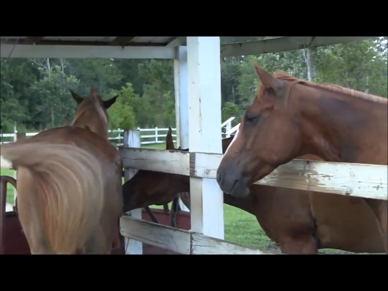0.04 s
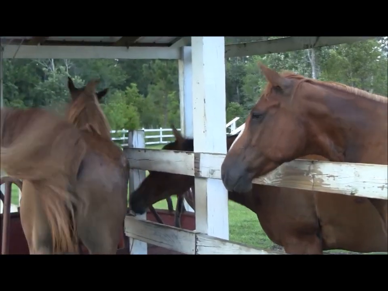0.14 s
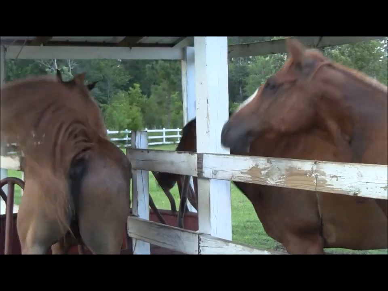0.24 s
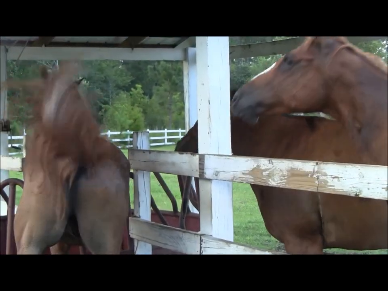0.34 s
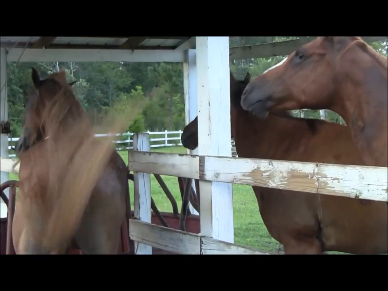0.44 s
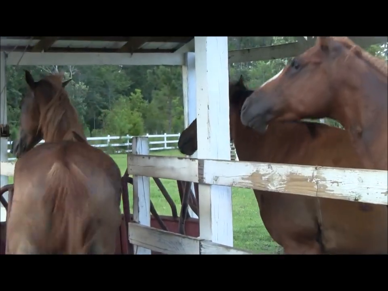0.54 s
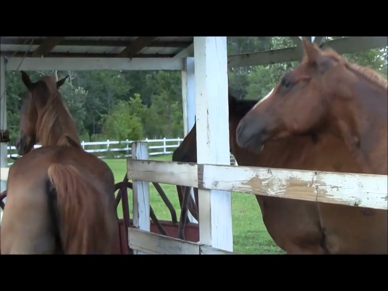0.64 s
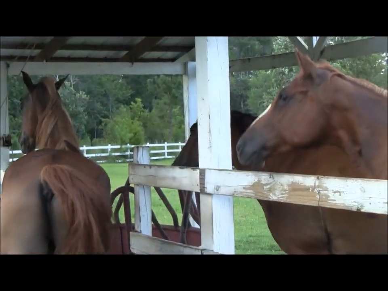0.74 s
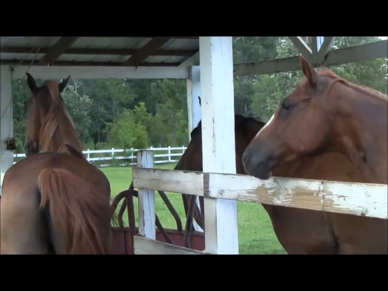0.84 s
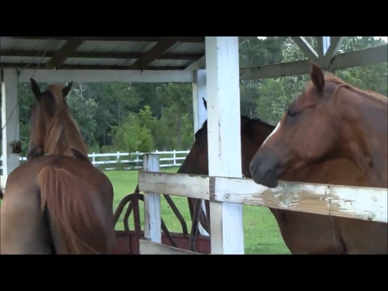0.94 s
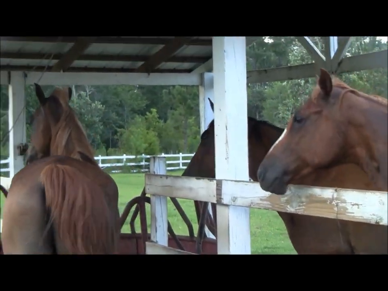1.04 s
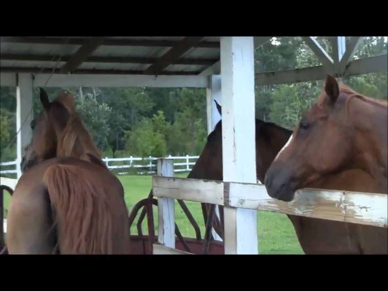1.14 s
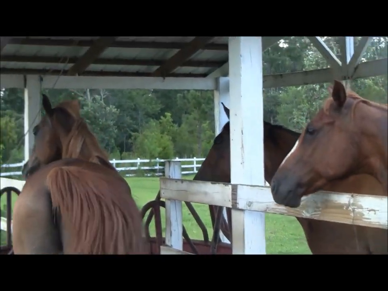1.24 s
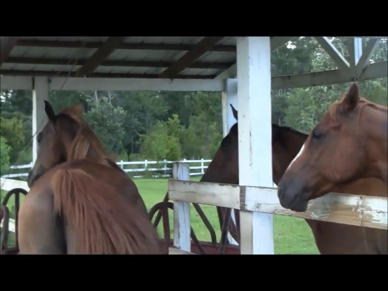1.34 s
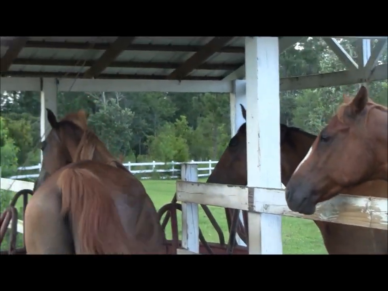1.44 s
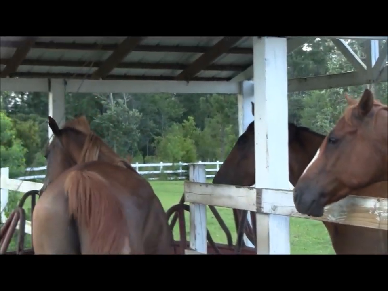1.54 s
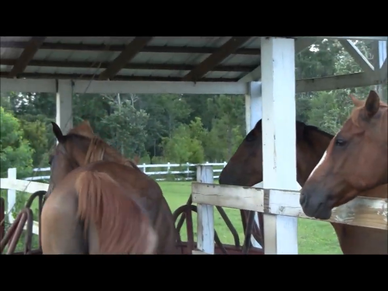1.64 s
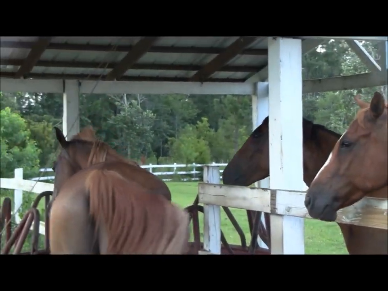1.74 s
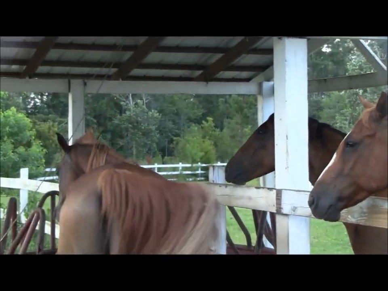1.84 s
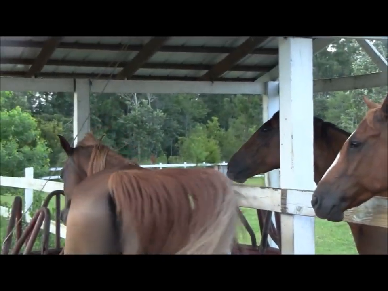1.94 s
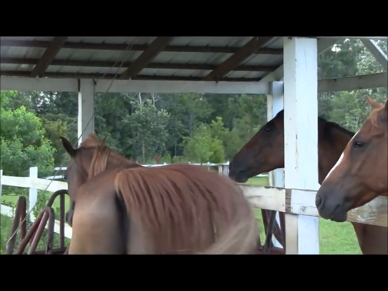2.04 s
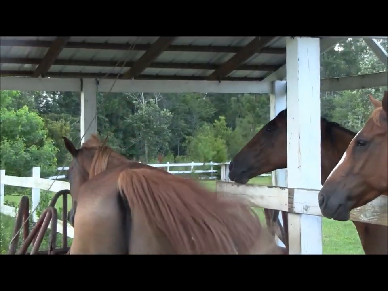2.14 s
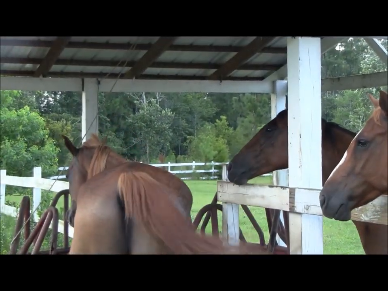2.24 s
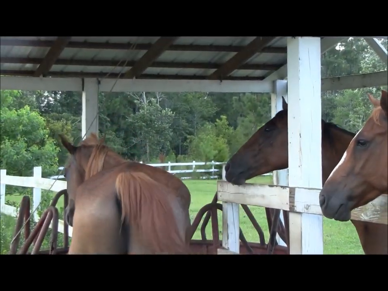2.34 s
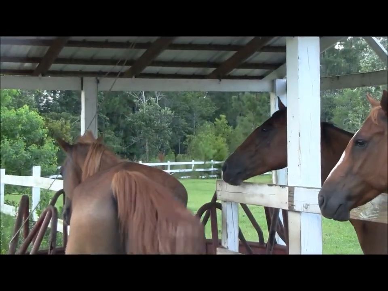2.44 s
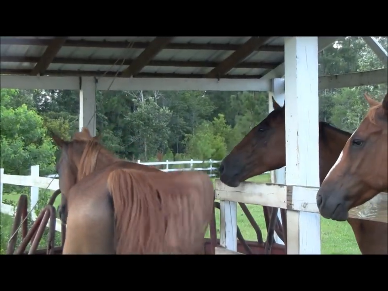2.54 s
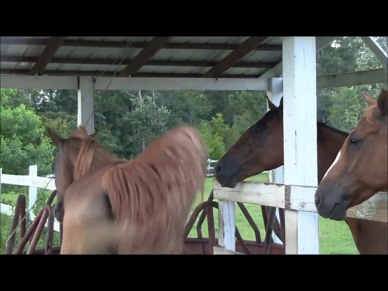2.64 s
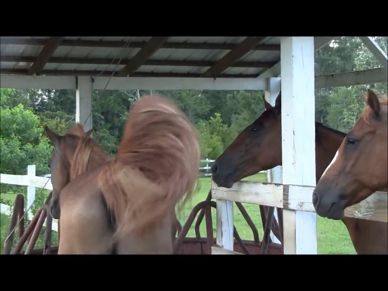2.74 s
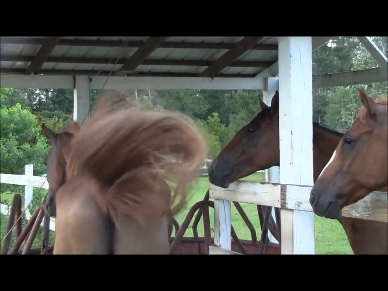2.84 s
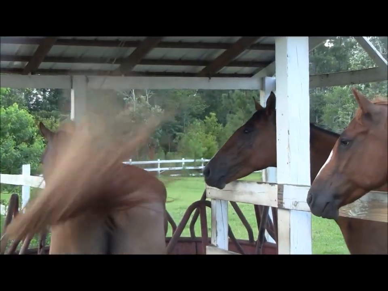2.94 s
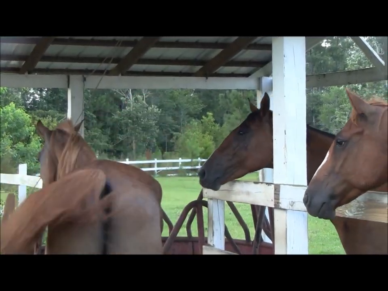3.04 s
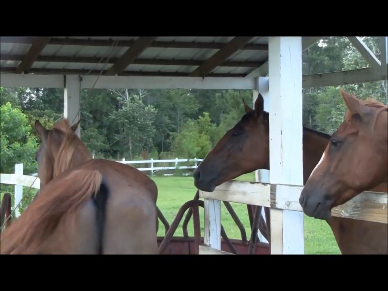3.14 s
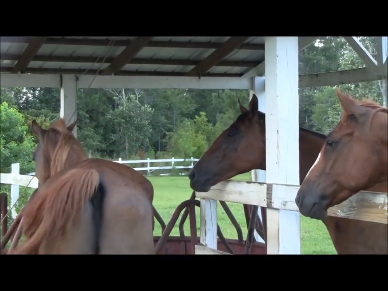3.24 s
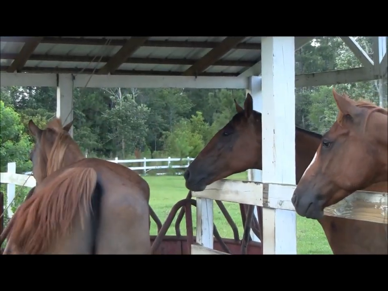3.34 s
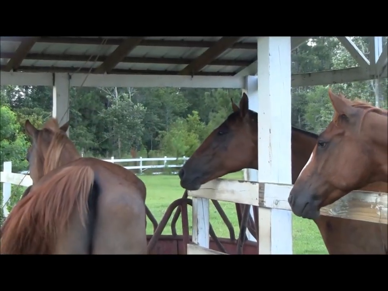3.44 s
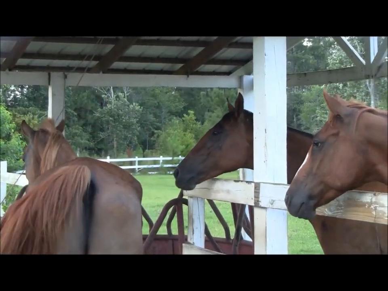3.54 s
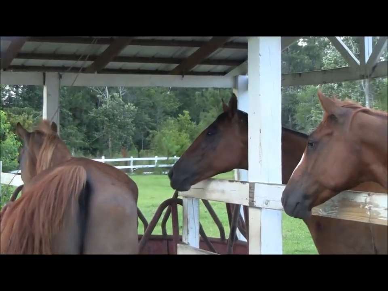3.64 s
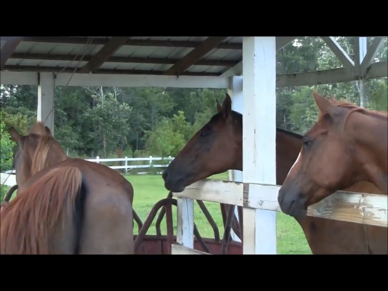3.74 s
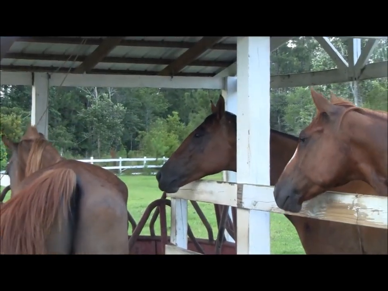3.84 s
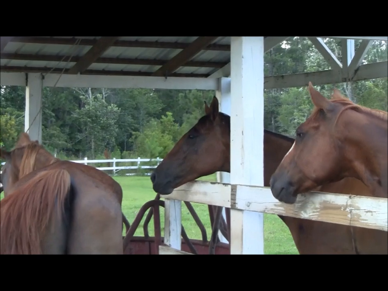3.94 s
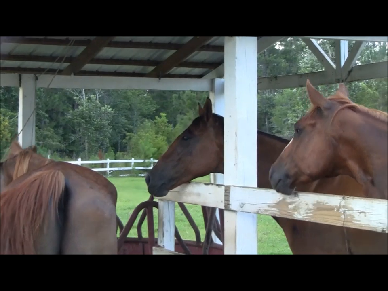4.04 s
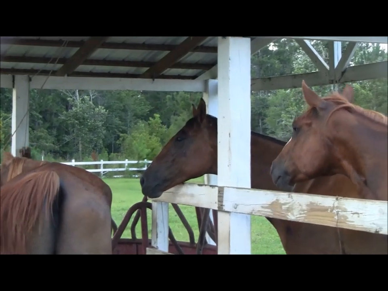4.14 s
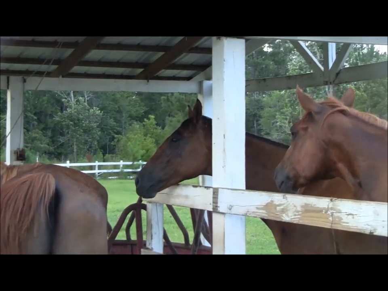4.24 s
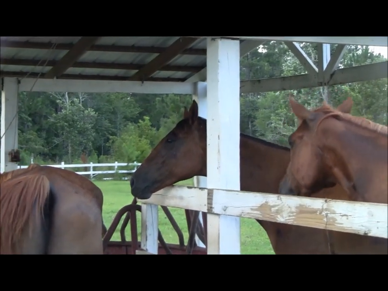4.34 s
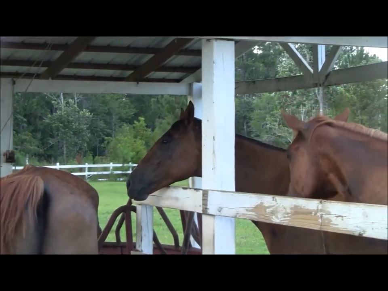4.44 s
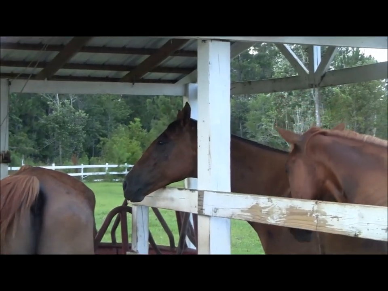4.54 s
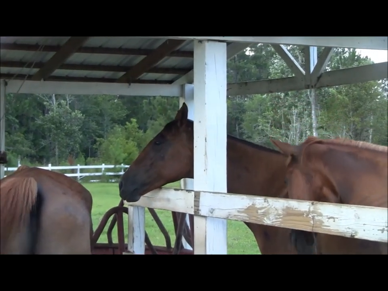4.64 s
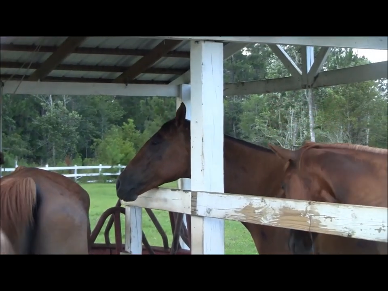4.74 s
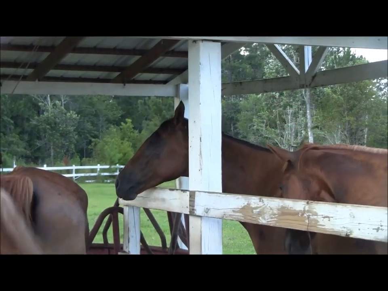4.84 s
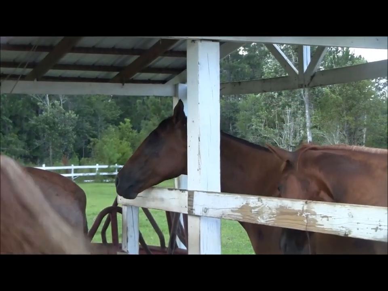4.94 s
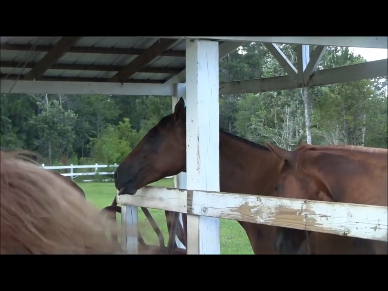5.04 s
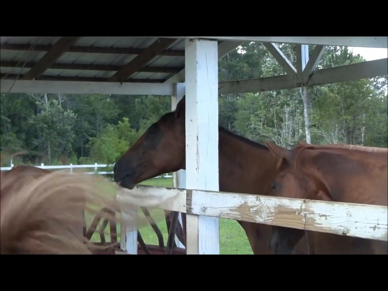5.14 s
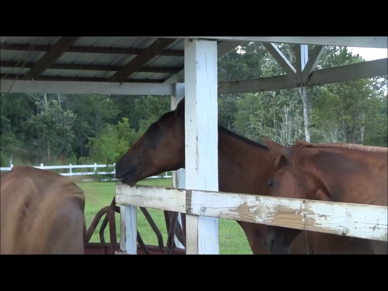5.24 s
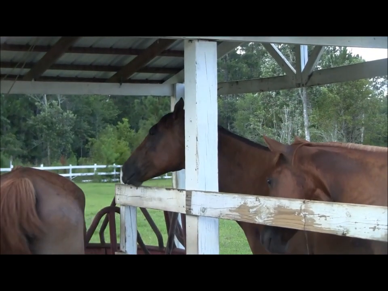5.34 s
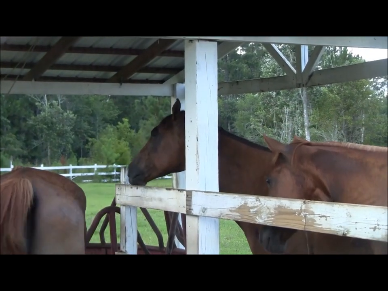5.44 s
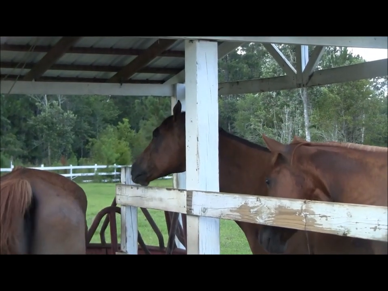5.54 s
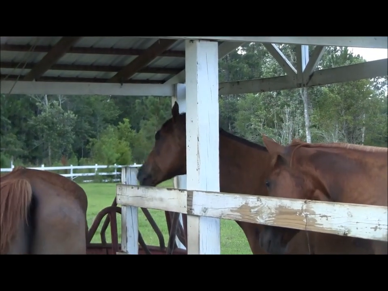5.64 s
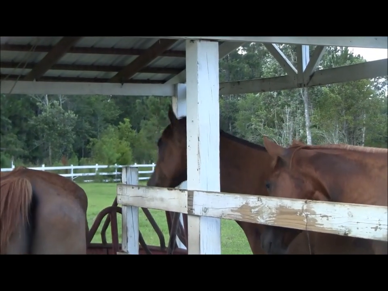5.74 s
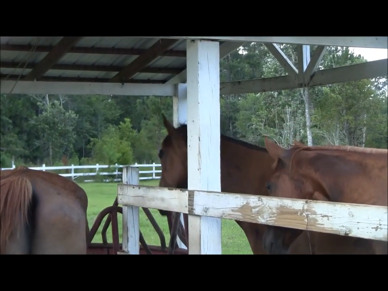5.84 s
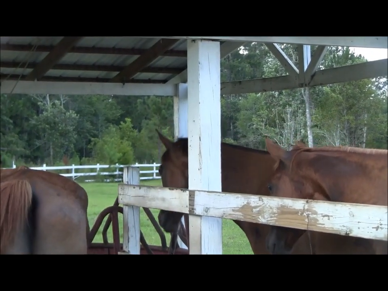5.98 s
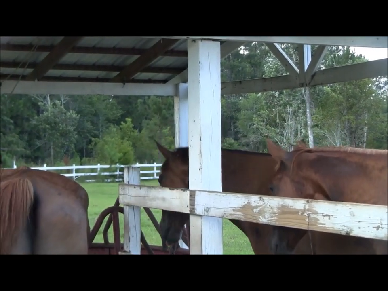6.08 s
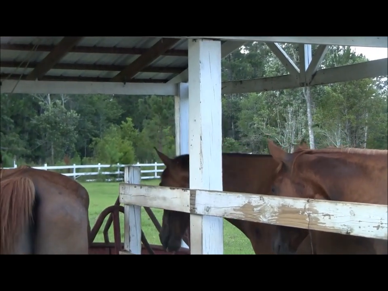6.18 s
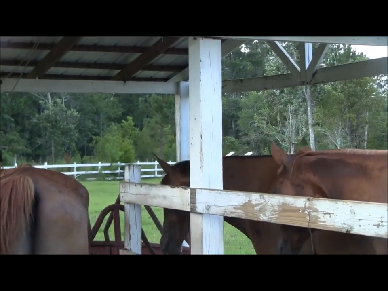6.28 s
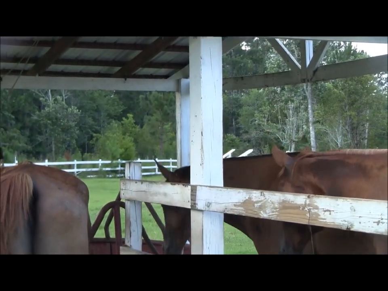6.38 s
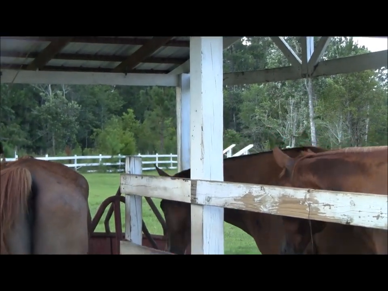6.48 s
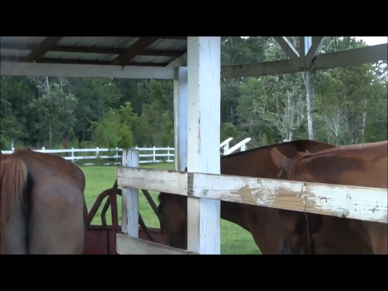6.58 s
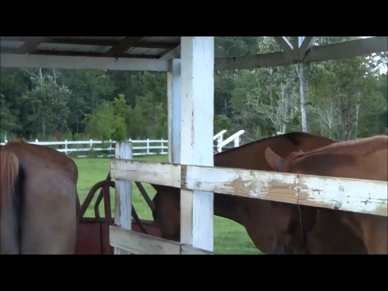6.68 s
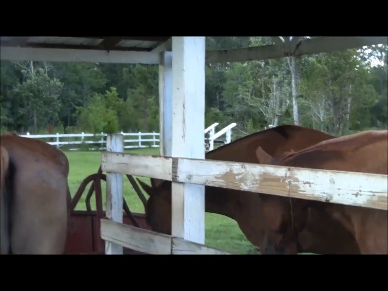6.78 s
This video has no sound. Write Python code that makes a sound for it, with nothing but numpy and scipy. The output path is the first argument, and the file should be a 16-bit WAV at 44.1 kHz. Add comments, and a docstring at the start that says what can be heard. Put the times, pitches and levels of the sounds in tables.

```python
"""Throughout, far traffic (shaped noise), an engine hum, pasture air and pulsed insect stridulation sound.
A horse squeals in an open shed: summed partials amid bursts of grainy breath noise, a rasp of gated noise,
a break to a rough register and a high whistle with sidebands. An overload drops the gain, which holds and
slowly comes back. Two small after-notes (partials with a pitch scoop) follow, hooves or rails tick (resonated
noise), tails swish (grainy noise), and near the end a bird gives two falling whistles (gliding tones)."""
import sys
import numpy as np
from scipy import signal
from scipy.fft import next_fast_len
from scipy.io import wavfile
from scipy.ndimage import uniform_filter1d

SR = 44100
rng = np.random.default_rng(int(sys.argv[2]) if len(sys.argv) > 2 else 0)


def wav_out(sig):
    """Save sig, one row per channel (or a flat mono array), as 16-bit PCM at SR to the path in sys.argv[1]."""
    wavfile.write(sys.argv[1], SR, np.round(np.clip(np.atleast_2d(sig).T, -1, 1) * 32767).astype(np.int16))


N = 300321
T = np.arange(N) / SR

# Likeness of the two ports before each source's scaling: (frequency [Hz], likeness [0-1])
PORT_LIKENESS = [(30, .88), (60, 1), (135, 1), (210, 0.77), (330, 0.42), (560, 0.17), (850, 0.61),
                 (1250, 1), (1900, 0.7), (2800, 0.36), (4000, 0.5), (5500, 0.27), (6800, 0.66),
                 (7700, 0.54), (8400, 0.77), (9300, 0.51), (10800, 0.17), (12000, 0.65)]
# Phase by which the right port leads: (frequency [Hz], lead [rad])
PORT_LEAD = [(20, 0), (230, 0), (300, 3.1), (600, 3.1), (750, -.3), (4000, -.4), (7000, .2), (7700, -.4),
             (8400, -.9), (9300, -2.3), (10400, -2.8), (11800, -1.1)]
# Port balance: (frequency [Hz], left minus right [dB])
PORT_BALANCE = [(60, -0.5), (110, 0.0), (200, 0.5), (380, 0.0), (700, 0.5), (1290, 1.0), (2380, 0),
                (4400, 1.5), (8120, -2.5), (15000, 2)]

# Far traffic: (time [s], engine rumble level [dB], tyre roar level [dB])
TRAFFIC_LEVELS = [(0, -46.5, -46.5), (.5, -50, -38.5), (1, -44, -39), (1.7, -43, -38.5), (2.5, -42.5, -37),
                  (3.4, -47, -40.5), (4.2, -49.5, -43), (5.4, -50, -43), (6.81, -50, -45)]
# Engine rumble spectrum: (frequency [Hz], relative density [dB per Hz])
RUMBLE_SPECTRUM = [(20, -46), (45, -41), (62, -14.5), (90, -15.5), (105, -6.5), (115, 3), (128, -9),
                   (160, -5.5), (198, -1.5), (235, -6.5), (290, -4), (420, -11), (550, -30), (900, -100)]
# Tyre roar spectrum: (frequency [Hz], relative density [dB per Hz])
ROAR_SPECTRUM = [(250, -37), (420, -5), (642, -4), (872, -1), (1160, -2), (1250, -2.5), (1490, -6.5),
                 (1870, -10.5), (3200, -28.5), (4160, -33.5), (7040, -120)]
# A vehicle's brighter whoosh on the road: (time [s], level [dB])
WHOOSH_LEVEL = [(0, -69), (1.5, -48), (3.3, -45.5), (3.55, -39.5), (3.83, -41), (4, -54.5), (5.8, -49.5),
                (6.2, -84), (6.81, -74)]
# Whoosh spectrum: (frequency [Hz], relative density [dB per Hz])
WHOOSH_SPECTRUM = [(700, -40), (1050, -6.5), (1300, 2), (1600, -5.5), (2100, -18.5), (3500, -39),
                   (7000, -89)]
# Level of the air: (time [s], level [dB])
AIR_LEVEL = [(0, -50.5), (1, -46), (2.5, -43.5), (4, -49), (5.5, -48.5), (6.81, -50)]
# Leaves and far insects: (frequency [Hz], relative density [dB per Hz])
AIR_SPECTRUM = [(1300, -52), (2200, -13), (3200, -14.5), (5600, -19.5), (6500, -20), (7100, -4.5),
                (7500, -8.5), (8100, -8.5), (8600, -11), (9500, -1), (10100, -6), (10900, -19),
                (12000, -35), (15600, -36)]
# A far engine's firing tone: (time [s], frequency [Hz], level [dB])
ENGINE_HUM = [(0, 136.3, -56), (2, 138, -50.5), (4.5, 137.3, -56), (5.4, 131.6, -56), (6.81, 127.6, -59)]

# Near cricket: (time [s], relative stroke level [dB])
CRICKET_LEVEL = [(0, -49.5), (1, -47), (2.4, -45.5), (5, -48.5), (5.9, -45.5), (6.81, -49)]
# Near cricket's pace, held until the next row: (time [s], wing stroke rate [1/s])
CRICKET_PACE = [(0, 52.22), (1.2, 49.9), (1.4, 51.02), (2, 51.46), (3.8, 50.26), (4.8, 50.5), (5.8, 49),
                (6.4, 49.78)]
# Steady pulsing insects: (centre [Hz], nominal width [Hz], pulse rate [1/s], relative gate width [cycles],
# level before fade [dB], right lead [rad], fade end [s])
PULSING_INSECTS = [(4765, 260, 24.8, .45, -70.5, -.2, 5.9), (9750, 600, 66.8, .55, -57, -2.1, 20)]

# Breath noise around the squeal (rows to 0.776 s), then tail swishes and shuffles:
# (peak time [s], length scale [s], bright hiss level [dB], duller rustle level [dB])
BREATH_AND_SWISH_BURSTS = [(0.14, 0.036, -53, -32.5), (0.188, 0.039, -67, -51), (0.262, 0.12, -49.5, -32.5),
                           (0.472, 0.037, -53, -42), (0.593, 0.074, -44, -47), (.68, 0.041, -49, -41.5),
                           (0.776, 0.058, -57, -49.5), (1.387, 0.044, -50, -39), (1.506, 0.036, -46, -46),
                           (1.912, 0.025, -45, -39.5), (1.98, 0.055, -54, -47), (2.49, 0.047, -55, -69),
                           (2.662, 0.028, -47, -64), (2.784, 0.067, -56, -62), (3.023, 0.04, -39.5, -51),
                           (3.07, 0.027, -55, -49), (3.152, 0.051, -42.5, -51), (3.257, 0.034, -53, -64),
                           (5.015, 0.014, -45.5, -41), (5.066, 0.027, -49, -45), (5.368, 0.022, -49, -56),
                           (5.417, 0.039, -53, -53), (5.55, 0.051, -54, -52), (5.574, 0.011, -49, -58),
                           (6.04, .02, -60, -65)]
# Bright hiss spectrum: (frequency [Hz], relative density [dB per Hz])
HISS_SPECTRUM = [(1500, -35), (3500, -18), (6000, -11), (9000, -4), (12000, -3), (15600, -17)]
# Duller rustle spectrum: (frequency [Hz], relative density [dB per Hz])
RUSTLE_SPECTRUM = [(150, -16), (500, -6), (1500, -3.5), (3000, -11), (5500, -23.5), (9000, -32),
                   (15600, -42)]

# The levels of the horse and the ticks below are relative: gains for nearness and port balance follow.
# The clear squeal, a short catch and then the held note: (time [s], pitch [Hz], fundamental level [dB],
# overtone level [dB], extra overtone slope [dB per partial])
CLEAR_SQUEAL = [(.145, 745, -52, -68, 4), (.165, 701, -45, -50, 1), (.18, 655.4, -38, -35.5, -3),
                (.193, 645, -35, -24.5, -3), (.206, 664, -36, -36, -0.5), (.216, 664, -18.5, -27, -3),
                (.225, 679, -11.5, -30, -2.5), (.24, 667, -17.5, -22.5, -5), (.26, 637.6, -16.5, -31, -1.5),
                (.28, 620, -17.5, -23.5, -1), (.3, 620, -16, -30, 1), (.331, 597.6, -15.5, -26.5, 0),
                (.345, 610, -52, -36, -3)]
# Offsets of partials 2-8 in the clear register: (level [dB])
CLEAR_OFFSETS = [-1.5, -8.5, -15, -19, -25, -33, -33]
# Chaotic flapping that rasps through the throat: (time [s], level [dB], throat frequency scale [ratio],
# brightness [dB per octave])
RASP_CURVE = [(0.199, -33.5, 1.43, -4), (.23, -26, 1.1, 0), (.255, -24.5, 0.98, 1.5), (.29, -36, 0.98, 0.5),
              (.325, -29, 1.04, 1), (.339, -19, 1.04, 0), (.375, -20.5, 1.015, 0.5),
              (0.411, -20, 0.93, 0.5), (0.429, -21, 0.95, 0), (.46, -27, 1.04, 0.5), (.51, -40.5, 1.04, 2),
              (.57, -55, 0.996, 0), (.605, -36, 1.01, 4.5), (.64, -38, 1.04, 4), (.67, -62, 0.76, -2)]
# Throat resonances: (frequency [Hz], nominal width [Hz], relative level [dB])
THROAT_RESONANCES = [(363, 81, -18.5), (573, 140, -0.5), (690, 230, -9), (1002, 200, 3), (1275, 110, -12),
                     (1539, 105, -2), (1770, 150, -8.5), (1965, 76, -18), (2510, 270, -20.5),
                     (2730, 170, -24.5), (3060, 330, -37), (3420, 220, -22.5), (3780, 820, -28.5),
                     (4270, 390, -26.5), (4970, 560, -41), (5740, 540, -41), (6340, 1100, -40)]
# High whistles beating with the folds: (fold rate [Hz], rows), each row being
# (time [s], whistle frequency [Hz], whistle level [dB], sideband level [dB])
WHISTLE_NOTES = [(659, [(.215, 1697, -48, -43), (.232, 1716, -29, -27), (.25, 1714, -25, -35),
                 (.265, 1708, -37, -28), (.3, 1727, -48, -45)]), (220, [(.305, 1872, -42, -60),
                 (.333, 1807, -22, -33), (.36, 1786, -45, -25.5), (.39, 1714, -23, -34),
                 (.45, 1766, -38, -23), (.51, 1732, -48, -55)]), (556, [(.597, 1530, -48, -60),
                 (.605, 1536, -41, -57), (.615, 1460, -27, -56), (.635, 1459, -29.5, -51),
                 (.68, 1453, -63, -72)])]
# Sidebands about each whistle: (shift [fold rates], level offset [dB])
SIDEBAND_OFFSETS = [(-1, -2.5), (-.5, -5), (1, -10), (1.6, -29)]
# Break to a rough register whose second partial leads, and its fading tail: (time [s], pitch [Hz],
# fundamental level [dB], overtone level [dB], extra overtone slope [dB per partial])
ROUGH_BREAK = [(.325, 521, -54, -30, -2), (.336, 497, -28.5, -16.5, 1), (.36, 503.6, -34, -19, -0.5),
               (.385, 483.2, -37.5, -20.5, -1), (.42, 465, -28, -25.5, -3), (.432, 509, -45, -20.5, 0),
               (.452, 502.6, -35, -27, 1.5), (.462, 504.6, -42, -48, 10.5), (.49, 504.3, -56, -30, 2),
               (.53, 502.4, -65, -39, 1.5), (.545, 467.5, -68, -47, 4), (.575, 445, -60, -45, 5),
               (.6, 512, -56, -40, -3)]
# Offsets of partials 2-5 in the rough register: (level [dB])
ROUGH_OFFSETS = [1, -20, -20, -27.5]
# Small after-notes: (start [s], length [s], pitch [Hz], level [dB])
AFTER_NOTE_EVENTS = [(.595, 0.06, 562, -33), (0.72, .04, 558, -41)]
# Offsets of partials 1-4 in an after-note: (level [dB])
AFTER_OFFSETS = [-2, 2, -20, -19]
# Ticks of a hoof or rail: (start [s], peak level [dB], centre [Hz])
TICK_EVENTS = [(0.679, -32, 2480), (1.913, -30, 3280), (4.457, -40, 2260), (4.83, -33.5, 600),
               (5.0121, -49, 2600), (5.064, -45, 2380), (5.375, -49, 6000), (5.572, -43, 3600)]

# Falling bird whistles: (start [s], length [s], first pitch [Hz], last pitch [Hz], level [dB])
BIRD_WHISTLES = [(6.285, .125, 3580, 3030, -66), (6.435, .14, 2860, 2150, -60)]

PAIR_MS, JITTER_MS = 2.1, 1.5  # greatest shift of alternate strokes; rms timing scatter
NEAR_DB = 10  # the horse stands close
SHED_DB, SHED_T60_S = -17, .3  # open sides return little
AFTER_RISE_S, AFTER_SCOOP = .01, .042  # pitch starts this fraction above its target
AFTER_START_DB, AFTER_SAG_DB, AFTER_END_DB = -26, -.5, -30
EDGE_HZ = 15720


def amp(db):
    """Decibel law: converts level to amplitude ratio."""
    return 10 ** (np.asarray(db) / 20)


def evened(x):
    """Power normalization: scales a signal to rms 1."""
    return x / np.sqrt(np.mean(x ** 2) + 1e-20)


def smoothed(x, size, axis=-1):
    """Moving average: suppresses fast variation along one axis."""
    return uniform_filter1d(x, size=size, axis=axis)


def read(points, hz):
    """Spectral interpolation: reads a table on a log-frequency axis."""
    f, value = np.transpose(points)
    return np.interp(np.log(hz + 1), np.log(f + 1), value)


def level(curve):
    """Amplitude envelope: interpolates (time [s], level [dB]) and converts it to gain."""
    return amp(np.interp(T, *np.transpose(curve)))


def resonate(x, hz, width):
    """Resonance by heterodyne: shifts the curve hz to zero, smooths twice, and shifts back."""
    turn = np.exp(2j * np.pi * np.cumsum(hz * np.ones(x.shape[-1])) / SR)
    r = np.exp(-np.pi * width / SR)
    baseband = signal.lfilter([(1 - r) ** 2], [1, -2 * r, r * r], x / turn + 1e-18)
    return 2 * (turn * baseband).real


def noise(spectrum, patchy_db, likeness=0.95, size=1024):
    """Partial coherence: rms-1 noise with drifting patches, as two microphone ports hear a wide source."""
    hz = np.fft.rfftfreq(size, 1 / SR)
    a, b, c, d, patches = rng.standard_normal((4 * N // size + 5, len(hz), 5)).T
    patches = evened(smoothed(smoothed(patches, 8, axis=0), 12, axis=1))
    same = np.clip(likeness * read(PORT_LIKENESS, hz), 0, 1)[:, None]
    left = a + 1j * b
    right = same * left + np.sqrt(1 - same ** 2) * (c + 1j * d)
    right = right * np.exp(1j * read(PORT_LEAD, hz))[:, None]
    lean = amp(read(PORT_BALANCE, hz) / 2)[:, None]
    colour = amp(read(spectrum, hz)[:, None] + patchy_db * patches)
    spectra = np.array([left * lean, right / lean]) * colour
    sound = signal.istft(spectra, nperseg=size, noverlap=3 * size // 4)[1]
    return evened(sound[:, :N])


def notes(tables, wobble, flutter_db=0.):
    """Harmonic synthesis: sums partials of an unsteady pitch; any level flutter affects only the overtones."""
    out = np.zeros(N)
    for rows in tables:
        s, hz, *levels_db = np.transpose(rows)
        on = (T >= s[0]) & (T < s[-1])
        t = T[on]
        shake = evened(smoothed(rng.standard_normal(len(t)), 200))
        flutter = rng.standard_normal((len(levels_db), len(t)))
        flutter = evened(smoothed(smoothed(flutter, 150), 150))
        phase = 2 * np.pi * np.cumsum(np.interp(t, s, hz) * (1 + wobble * shake)) / SR
        tone = np.zeros(len(t))
        for k, db in enumerate(levels_db):
            partial_db = np.interp(t, s, db) + flutter_db * flutter[k] * np.log2(k + 1)
            tone += amp(partial_db) * np.sin((k + 1) * phase)
        edges = signal.windows.tukey(len(t), min(0.0044 / (s[-1] - s[0]), 1))
        out[on] += np.sqrt(2) * tone * edges
    return out


def traffic():
    """Broadband radiation: low engine rumble, tyre roar and a brighter whoosh have separate noise spectra."""
    s, rumble_db, roar_db = np.transpose(TRAFFIC_LEVELS)
    rumble = amp(np.interp(T, s, rumble_db)) * noise(RUMBLE_SPECTRUM, 0.65, size=4096)
    roar = amp(np.interp(T, s, roar_db)) * noise(ROAR_SPECTRUM, 0.99)
    whoosh = level(WHOOSH_LEVEL) * noise(WHOOSH_SPECTRUM, 2.0)
    return rumble + roar + whoosh


def pasture_air():
    """Superposition of many weak sources: leaves and far insects merge into shaped noise."""
    return level(AIR_LEVEL) * noise(AIR_SPECTRUM, .8)


def engine_hum():
    """Periodic excitation: a far engine's firing gives one unsteady low tone."""
    return notes([ENGINE_HUM], 0.061)


def cricket():
    """Stridulation: each wing stroke is a 9.6 ms falling chirp with a dip in its envelope."""
    s, rate = np.transpose(CRICKET_PACE)
    count = np.cumsum(rate[np.searchsorted(s, T, "right") - 1]) / SR
    n = np.arange(count[-1])
    jitter, size, swap = rng.standard_normal((len(n), 3)).T
    # Alternate strokes bunch in pairs; a sign change swaps partners.
    partner = np.tanh(2 * evened(smoothed(swap, 12)))
    shift_ms = (-1) ** n * PAIR_MS * partner + JITTER_MS * jitter
    at = np.interp(n, count, T) + shift_ms / 1000 - .002
    train = np.zeros(N)
    stroke_db = 1.84 * size + np.interp(at, *np.transpose(CRICKET_LEVEL))
    train[np.clip((at * SR).astype(int), 0, N - 1)] = amp(stroke_db)
    u = np.linspace(0, 1, round(0.0096 * SR))
    dip = 1 - 0.45 * np.exp(-((u - .55) / 0.083) ** 2)
    shape = signal.windows.tukey(len(u), .5) * (1 - 0.25 * u) * dip
    phase = 2 * np.pi * np.cumsum(8050 - 550 * u) / SR
    ports = []
    for lead in (0, read(PORT_LEAD, 7500)):
        chirp = 2.04 * shape * np.sin(phase + lead)
        ports.append(signal.oaconvolve(train, chirp)[:N])
    return np.array(ports)


def pulsers():
    """Amplitude modulation: narrow bands of scraping noise throb at a nearly steady stroke rate."""
    out = np.zeros((2, N))
    for hz, width, rate, duty, db, lead, stop in PULSING_INSECTS:
        drift = evened(smoothed(rng.standard_normal(N), SR // 4))
        cycle = np.cumsum(rate * (1 + 0.0087 * drift)) / SR % 1
        gate = np.exp(-((cycle - .5) / (duty / 2)) ** 2)
        scrape = resonate(rng.standard_normal(N), hz, width) * gate
        scrape = resonate(scrape, hz, 2 * width)
        analytic = signal.hilbert(scrape, next_fast_len(N))[:N]
        ports = (analytic * np.exp(1j * np.array([[0], [lead]]))).real
        fade = np.clip((stop - T) / 0.2, .3, 1)  # a residue remains
        out += amp(db) * evened(ports) * fade
    return out


def breath_and_swishes():
    """Turbulence and friction: fast-rising, slower-dying bursts mix bright hiss and duller rustle, both grainy."""
    s, half, hiss_db, rustle_db = np.transpose(BREATH_AND_SWISH_BURSTS)
    coarse = T[::32]
    since = coarse[:, None] - s
    bells = np.exp(-(since / np.where(since < 0, .5 * half, 1.4 * half)) ** 2)
    grain = amp(0.28 * evened(smoothed(rng.standard_normal(N), 60)))
    hiss_level = np.interp(T, coarse, bells @ amp(hiss_db))
    rustle_level = np.interp(T, coarse, bells @ amp(rustle_db))
    hiss = hiss_level * noise(HISS_SPECTRUM, 1.7, likeness=1.5)
    rustle = rustle_level * noise(RUSTLE_SPECTRUM, 1.8, likeness=2.15)
    return grain * (hiss + rustle)


def register(rows, overtones_db):
    """Harmonic spectrum: spreads the overtone level over the partials of one register."""
    steps = np.arange(len(overtones_db))
    return [(s, hz, low_db, *(high_db + slope_db * steps + overtones_db))
            for s, hz, low_db, high_db, slope_db in rows]


def squeal():
    """Periodic phonation: a clear squeal of harmonic partials on a gliding pitch."""
    return notes([register(CLEAR_SQUEAL, CLEAR_OFFSETS)], 0.0035, flutter_db=2.0)


def shed(x):
    """Sparse reverberation: decaying reflections of random sign from roof and posts differ at each port."""
    size = SR // 2
    taps = rng.choice([-1., 1.], (2, size)) * (rng.random((2, size)) < 1500 / SR)
    taps = taps + .5 * taps[::-1]
    taps = taps * amp(-60 * T[:size] / SHED_T60_S) * (T[:size] > .006)
    return signal.fftconvolve(x[None], taps / np.linalg.norm(taps[0]), axes=1)[:, :N]


def rasp():
    """Source-filter principle: irregular flaps, about 230 a second, gate breath noise through the throat."""
    s, db, scale, bright_db = np.transpose(RASP_CURVE)
    t = T[:SR]
    unsteady = evened(smoothed(rng.standard_normal(SR), 250))
    turns = np.cumsum(230 * (1 + .35 * unsteady)) / SR
    flaps = (0.51 + np.exp(-(turns % 1) / 0.15)) * rng.standard_normal(SR)
    throat = np.zeros(SR)
    for k, (hz, width, g_db) in enumerate(THROAT_RESONANCES):
        gain = amp(g_db + np.log2(hz / 1000) * np.interp(t, s, bright_db))
        formant = resonate(flaps, hz * np.interp(t, s, scale), width) / np.sqrt(width)
        throat += (-1) ** k * gain * formant
    throat = throat / np.sqrt(smoothed(throat ** 2, 700))  # steady breath pressure evens the loudness
    return np.pad(throat * amp(np.interp(t, s, db, -120, -120)), (0, N - SR))


def beating():
    """Coupled oscillation: two oscillators in one larynx, the folds putting sidebands around the whistle."""
    lines = []
    for fold_hz, rows in WHISTLE_NOTES:
        s, hz, db, side_db = np.transpose(rows)
        lines.append(np.transpose([s, hz, db]))
        for k, g_db in SIDEBAND_OFFSETS:
            lines.append(np.transpose([s, hz + k * fold_hz, side_db + g_db]))
    return notes(lines, 0.0096)


def rough_break():
    """Register transition: lower, less steady phonation has a leading second partial."""
    return notes([register(ROUGH_BREAK, ROUGH_OFFSETS)], 0.021, flutter_db=1.0)


def after_note(start, length, hz, db):
    """Transient phonation: a small grunt rises quickly as its pitch scoops down, then fades."""
    shape = [(start, hz * (1 + AFTER_SCOOP), AFTER_START_DB),
             (start + AFTER_RISE_S, hz, 0),
             (start + 2 * AFTER_RISE_S, hz, AFTER_SAG_DB),
             (start + length, hz, AFTER_END_DB)]
    return [(s, f, *(db + g_db + np.array(AFTER_OFFSETS))) for s, f, g_db in shape]


def after_notes():
    """Harmonic superposition: the partials of each small grunt share one pitch curve."""
    return notes([after_note(*row) for row in AFTER_NOTE_EVENTS], 0.0035, flutter_db=2.0)


def ticks():
    """Impact resonance: a short decaying crack is coloured around its own centre frequency."""
    out, t = np.zeros(N), T[:1500]
    for s, db, hz in TICK_EVENTS:
        burst = rng.standard_normal(len(t)) * amp(-60 * t / .03)  # falls 60 dB in 30 ms
        crack = resonate(burst, hz, 1.6 * hz)
        out[round(s * SR):][:len(t)] += amp(db) * crack / abs(crack).max()
    return out


def bird():
    """Frequency glide: thin, slightly unsteady whistles fall in pitch."""
    return notes([[(s, from_hz, db), (s + length, to_hz, db)]
                  for s, length, from_hz, to_hz, db in BIRD_WHISTLES], 0.006)


def scene():
    """Linear superposition: adds the close horse, its shed reflections and the surrounding pasture."""
    field = traffic() + pasture_air() + engine_hum() + cricket() + pulsers() + bird()
    bursts = breath_and_swishes()
    voice = squeal() + rasp() + beating() + rough_break() + after_notes()
    # An open mouth radiates little bass.
    mouth = signal.butter(4, 330, "highpass", fs=SR, output="sos")
    close = amp(NEAR_DB) * signal.sosfilt(mouth, voice) + ticks()
    direct = close * amp([[.2], [-.2]])  # left and right balance in dB
    return direct + amp(SHED_DB) * shed(close) + field + bursts


def record(dry):
    """Gain control: overload steps the gain down; it holds, then climbs at a steady rate before a band limit."""
    power = uniform_filter1d((dry ** 2).mean(0), size=300, origin=149)
    loud = np.roll(power > amp(-21.5) ** 2, 480)  # the control reacts 11 ms late
    last = np.maximum.accumulate(np.where(loud, T, -100))
    # A 10.1 dB cut holds for 1.7 s after the last overload, then recovers at 4.94 dB/s.
    cut_db = np.clip(10.1 - 4.94 * np.maximum(T - last - 1.7, 0), 0, None)
    ducked = dry / amp(uniform_filter1d(cut_db, size=60, origin=29))
    band_limit = signal.firwin(1023, EDGE_HZ, window=("kaiser", 9), fs=SR)
    return signal.oaconvolve(ducked, band_limit[None], "same")


dry = scene()
out = record(dry)
wav_out(out)
```